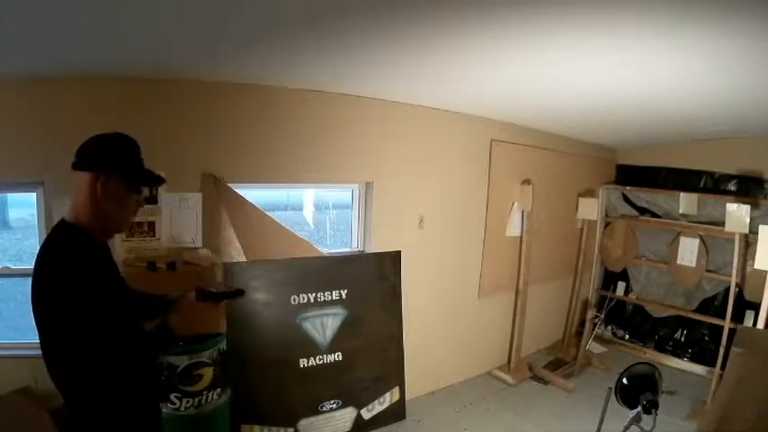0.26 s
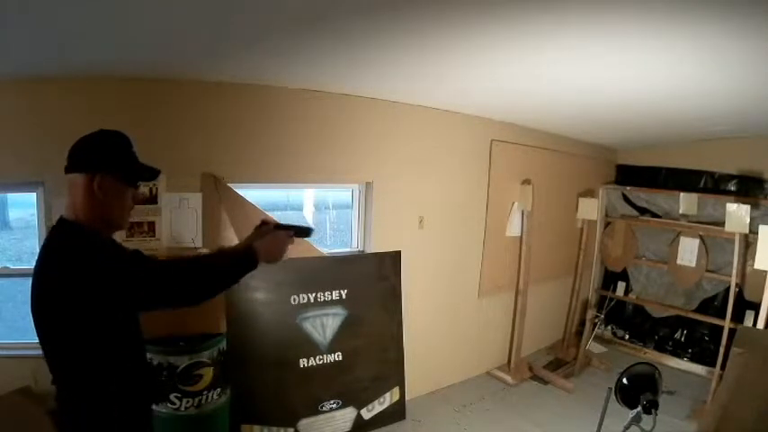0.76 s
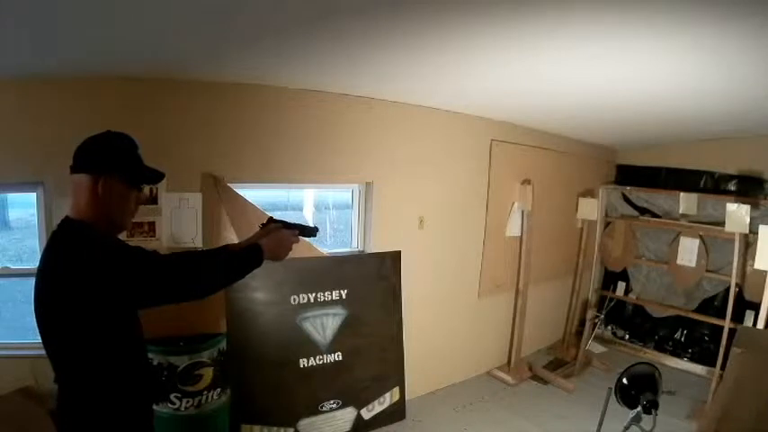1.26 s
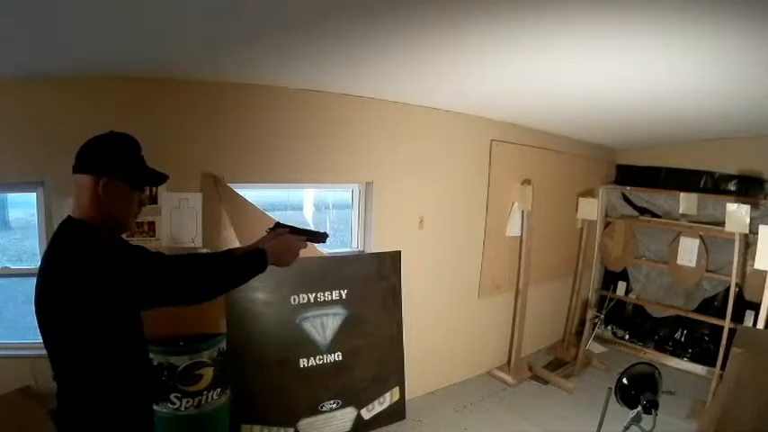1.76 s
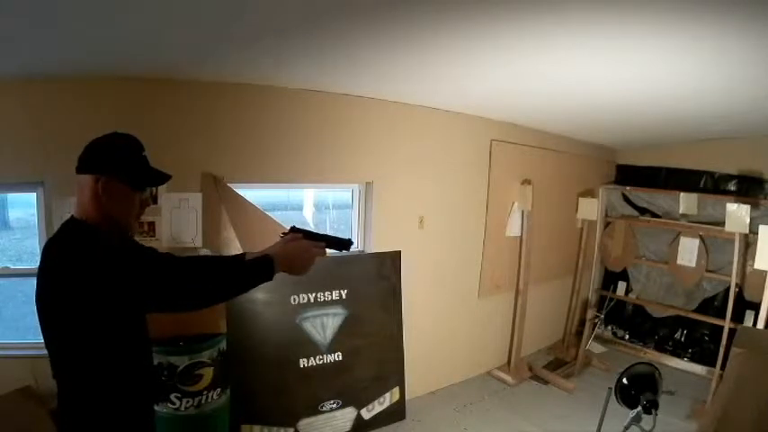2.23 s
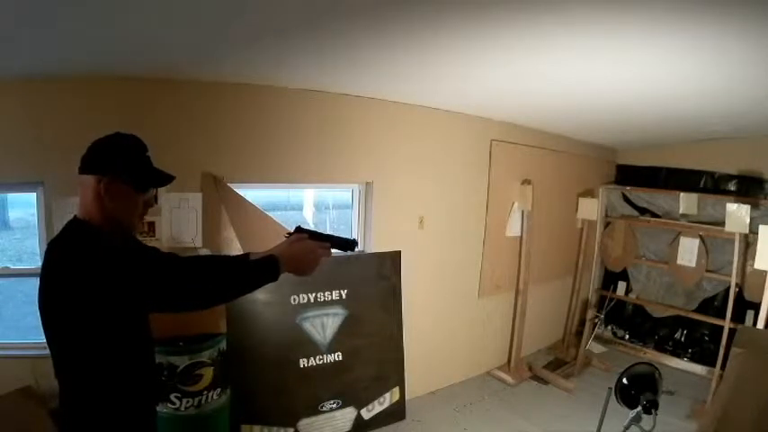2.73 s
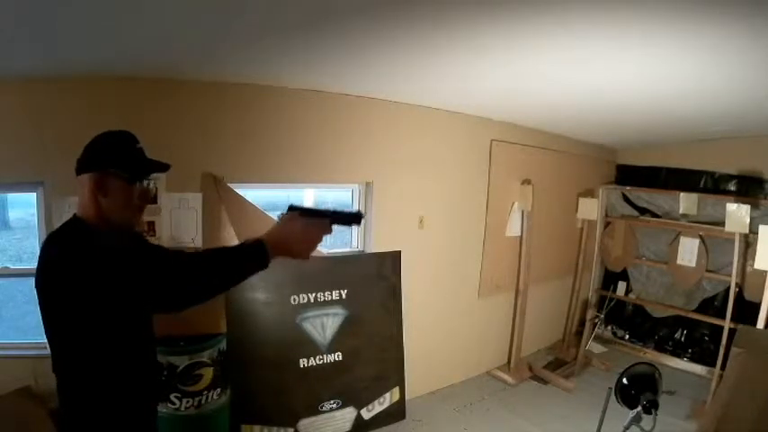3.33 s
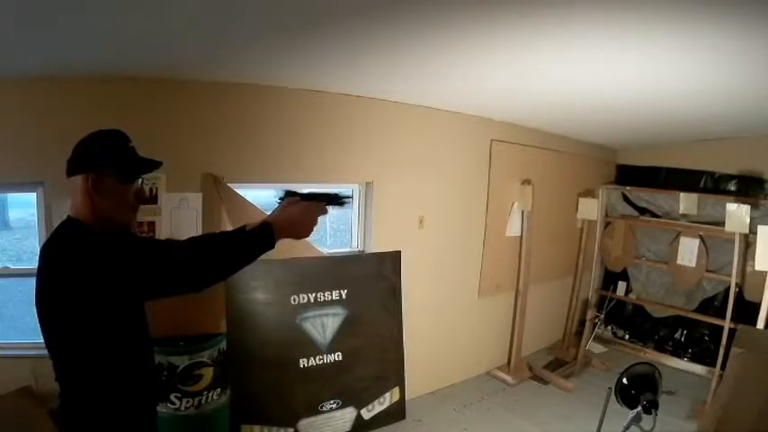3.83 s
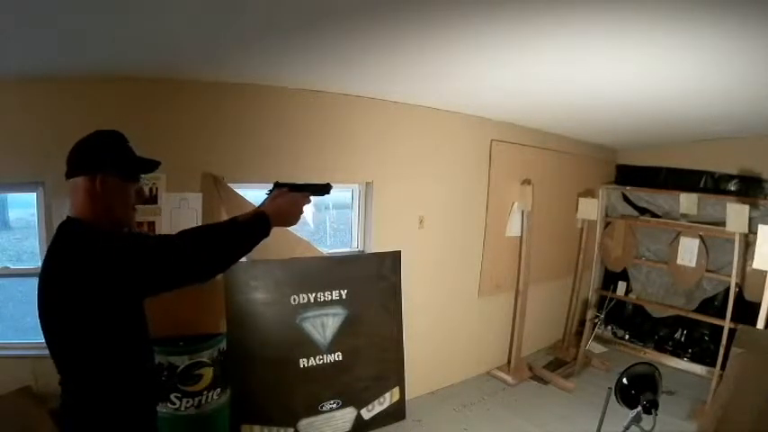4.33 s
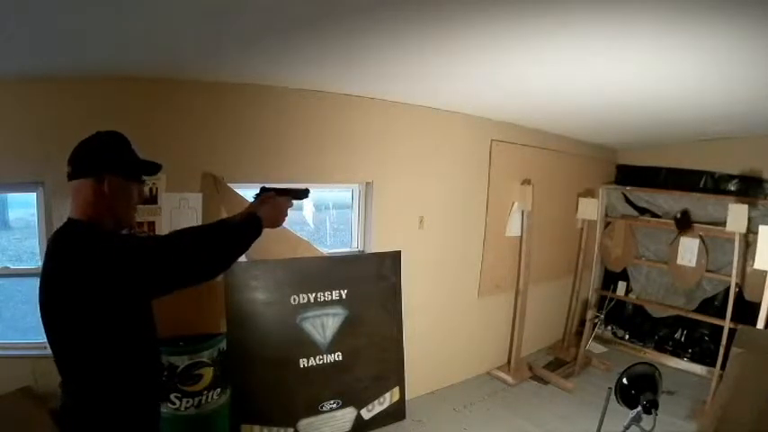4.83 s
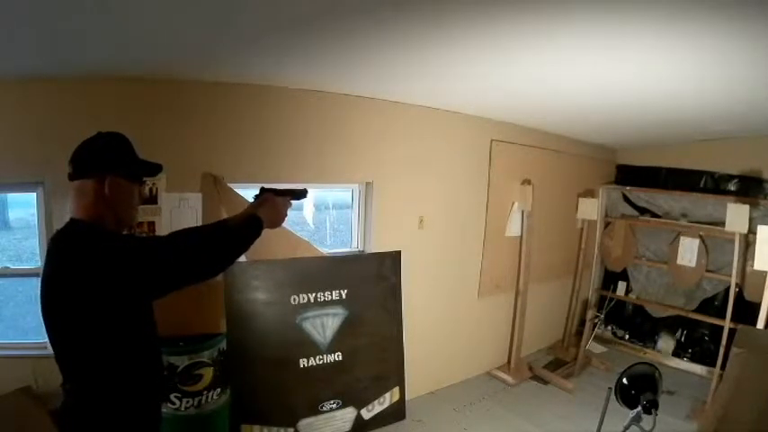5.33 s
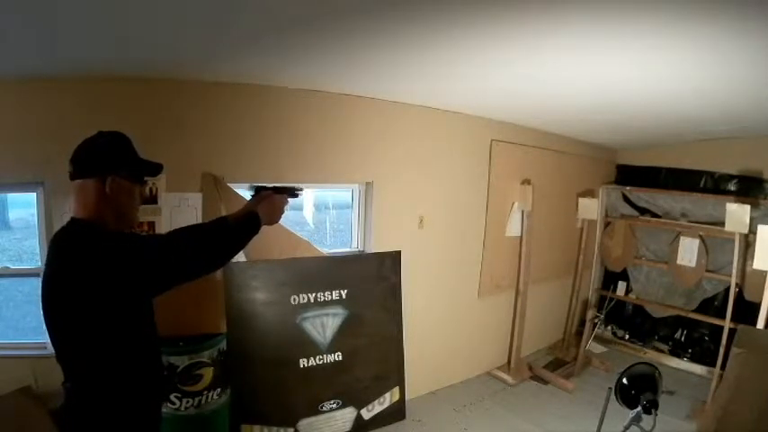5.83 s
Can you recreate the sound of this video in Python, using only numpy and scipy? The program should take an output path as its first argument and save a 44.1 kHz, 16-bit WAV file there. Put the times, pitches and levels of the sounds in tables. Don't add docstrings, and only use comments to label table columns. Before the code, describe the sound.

In a bare, reverberant workshop, a trigger creaks and a pistol slide clacks loudly. After a pause come two separate gas-pistol shots, then seven in a quick string. Each is a hard, hollow pop with a metallic slide clatter and a pellet clanking on steel farther off. Later targets topple with rattles and pellets tick on the floor. A small nearby camera microphone clips and ducks.

```python
import sys
import numpy as np
from scipy import signal
from scipy.fft import rfft, irfft, next_fast_len
from scipy.io import wavfile
from scipy.ndimage import uniform_filter1d, map_coordinates

SR = 44100
rng = np.random.default_rng(int(sys.argv[2]) if len(sys.argv) > 2 else 0)


def gain_from_db(level_db):
    decades = np.asarray(level_db, float) / 20
    return 10 ** decades


def put_to_file(sound):
    columns = np.atleast_2d(sound).T
    safe = np.clip(columns, -1, 1)
    whole_steps = np.round(safe * 32767)
    wavfile.write(sys.argv[1], SR, whole_steps.astype(np.int16))


N = 268569


def along(points, hz):
    f, value = np.transpose(points)
    return np.interp(np.log(hz + 1), np.log(f + 1), value)


def unit(x):
    return x / np.sqrt(np.mean(x ** 2) + 1e-20)


def coloured(x, gain):
    m = next_fast_len(len(x) + 2048)
    cepstrum = irfft(np.log(gain(np.fft.rfftfreq(m, 1 / SR)) + 1e-6), m)
    cepstrum[1:m // 2] *= 2
    cepstrum[m // 2 + 1:] = 0
    response = np.exp(rfft(cepstrum))
    return irfft(rfft(x, m) * response, m)[:len(x)]


def add(track, s, x):
    part = track[round(s * SR):][:len(x)]
    part += x[:len(part)]


# f/Hz, t60/s, level/dB
ROOM_DECAY = [(100.1, .26, -9), (331.24, 0.32887, 0), (1030.9, 0.43863, -1.5), (2864.8, 0.41184, 1.5),
              (8127, 0.34132, 1), (14942, 0.28693, -7)]


def roomy(x, wet_db, source=None):
    source = x if source is None else source
    hz, t, noise = signal.stft(rng.standard_normal(SR * 3 // 4), SR, nperseg=256)
    t60 = along([(f, decay) for f, decay, _ in ROOM_DECAY], hz)[:, None]
    walls_db = along([(f, level) for f, _, level in ROOM_DECAY], hz)[:, None]
    tail = signal.istft(noise * gain_from_db(walls_db - 60 * t / t60), SR, nperseg=256)[1]
    tail *= 1 - np.exp(-np.arange(len(tail)) / SR / 0.0017)
    wet = signal.fftconvolve(source, tail / np.linalg.norm(tail))
    return gain_from_db(wet_db) * wet + np.pad(x, (0, len(wet) - len(x)))


def resonant(spectrum, modes, hz):
    peaks = sum(gain_from_db(db) / (1 + ((hz - centre) / width) ** 2) for centre, width, db in modes)
    return gain_from_db(along(spectrum, hz)) + peaks


def blow(spectrum, modes, tilt, t60, rise, wet_db):
    t = np.arange(SR // 8) / SR
    spikes = rng.standard_normal(len(t)) * gain_from_db(3.7045 * rng.standard_normal(len(t)))
    burst = spikes * gain_from_db(-60 * t / t60) * (1 - np.exp(-t / rise)) ** 2
    burst = coloured(burst, lambda hz: resonant(spectrum, modes, hz) * gain_from_db(along(tilt, hz)))
    pulse = coloured(1. * (t == 0), lambda hz: resonant(spectrum, modes, hz) * gain_from_db(0.73 * along(tilt, hz)))
    pulse *= np.linalg.norm(burst) / np.linalg.norm(pulse)
    return roomy(burst, wet_db, pulse) / np.abs(burst).max()


# f/Hz, level/dB per Hz
ROOM_TONE = [(12, -29), (20, 1), (81, -18.5), (98, -16), (222, -22.5), (262, -24), (367, -25),
             (1330, -34.5), (7520, -42), (8890, -42), (16000, -39)]
ROOM_TONE_DB = -56
WHINE_HZ, WHINE_DB = 8658, -75


def hush():
    def density(hz):
        drone = gain_from_db(-13.0) * 20 / np.hypot(20, 2 * (hz - 70))
        return gain_from_db(along(ROOM_TONE, hz)) + drone

    tone = unit(coloured(rng.standard_normal(N), density))
    whine = np.sin(2 * np.pi * WHINE_HZ * np.arange(N) / SR)
    return gain_from_db(ROOM_TONE_DB) * tone + gain_from_db(WHINE_DB + 6) * whine


# t/s, peak level/dB, treble level/dB, body level/dB, echo level/dB
TICKS = [(0.1779, -29.5, -6, -2.5, 5.5), (0.1882, -32, -8.5, 9.5, 9.5), (0.649, -48.5, -18.5, 17.5, -4),
         (0.7727, -46, -11.5, 7, -1.5), (0.8093, -53.5, -10.5, 0.5, 8.5), (0.8803, -48.5, -11.5, -5.5, 1),
         (1.1105, -54.5, -19.5, -21, -2.5), (1.295, -35, -5.5, 10.5, 6), (1.6888, -21.5, -16.5, -8, 3.5),
         (2.0143, -42.5, -16, 2.5, 10.5), (2.1724, -47.5, -17.5, 6.5, 5.5), (2.2282, -35.5, -9, 4.5, 10),
         (2.4114, -45, -25, 6, 5), (2.578, -41, -18.5, 5.5, 5.5), (2.9916, -22, -16.5, -14, 2.5),
         (3.0347, -9.5, -17.5, -18, -5.5), (3.048, -19.5, -25.5, -5, 2), (4.1279, -8.5, -15, -11.5, -3.5),
         (4.7999, -18, 6, -11, 1.5), (4.8575, -16, -16.5, 15, 3.5), (4.9485, -23, 14, -6, -17),
         (5.1804, -26, -16.5, 5, -1.5), (5.3983, -9.5, -6.5, -7.5, -4)]
# f/Hz, level/dB per Hz
CLICK_SPECTRUM = [(120, -75.5), (200, -45), (777, -30.5), (1040, 1.5), (1560, -4.5), (1870, -6.5),
                  (3370, -9), (3760, -10), (4270, -7.5), (6640, -8.5), (7270, -15), (8270, -7.5),
                  (16000, -19)]
TICK_LOW_DB, BODY_DEEPENS = 26.5, .45


def ticks(air):
    out = np.zeros(N)
    for s, db, treble_db, body_db, wet_db in TICKS:
        low_db = TICK_LOW_DB + BODY_DEEPENS * body_db
        tilt = [(300, low_db - 5), (700, low_db), (1050, body_db), (2200, body_db),
                (3500, 0.0036), (8000, treble_db + 9.5)]
        click = blow(CLICK_SPECTRUM, [], tilt, t60=0.014, rise=.0004, wet_db=wet_db)
        add(out, s, gain_from_db(db - 0.5) * air(s) * click)
    return out


# t/s, peak level/dB, burst t60/s, echo level/dB
RACK = [
    (0.203, -26.5, 0.04905, 0.5),
    (0.2114, 0, 0.05666, -0.5),
    (0.2162, -2, .03, -2),
    (0.22, -4.5, .03, -6.5),
    (1.3333, -19, .04, 0),
    (2.586, -15.5, 0.045, -1),
]
# f/Hz, width/Hz, level/dB
CATCH_MODES = [(1075.8, 210, -8.5), (2039.8, 630, 0.5), (2921.2, 240, -9), (3754.7, 280, -2),
               (5148.5, 670, 1), (6731, 470, -0.5), (8208, 1200, -8), (10685, 550, -6), (12230, 2300, -5),
               (15018, 590, -15)]


def rack(air):
    out = np.zeros(N)
    modes = [(hz, width / 2, db + 5.5) for hz, width, db in CATCH_MODES]
    tilt = [(300, -2.5), (600, 3.0), (900, 2)]
    for s, db, t60, wet_db in RACK:
        click = blow(CLICK_SPECTRUM, modes, tilt, t60, rise=0.00084, wet_db=wet_db)
        add(out, s, gain_from_db(db) * air(s) * click)
    return out


# f/Hz, level/dB per Hz
METAL_SPECTRUM = [(24, -60), (40, -21.5), (81, -13.5), (130, -18.5), (226, -7.5), (455, -6), (516, -4),
                  (790, -5.5), (1410, 0), (2910, -16.5), (3830, -21.5), (4130, -12.5), (7540, -30.5),
                  (11300, -17), (16000, -30.5)]
# f/Hz, width/Hz, level/dB
FRAME_MODES = [(1473.2, 630, -3), (2186.7, 150, -2.5), (3755.1, 77, 6.5), (5364.3, 260, -3),
               (6770.4, 220, -8.5), (8469.8, 350, -7.5), (11045, 120, -6), (11661, 120, -15.5),
               (11929, 260, -12.5), (14650, 1900, -15)]


def blows(table, air, gain_db, wet_db, rise):
    out = np.zeros(N)
    modes = [(hz, 2.1783 * width, db - 11) for hz, width, db in FRAME_MODES]
    for s, db, treble_db, thump_db, ring_db, t60 in table:
        tilt = [(70, thump_db + 15.5), (250, thump_db + 24), (600, 0.0041), (3300, 0.007),
                (3800, ring_db + 18.5), (4400, 0.0098), (6500, treble_db + 12)]
        knock = blow(METAL_SPECTRUM, modes, tilt, t60, rise, wet_db)
        add(out, s, gain_from_db(db + gain_db) * air(s) * knock)
    return out


# t/s, gas blast level/dB, gain reduction level/dB, slide back after t/s, slide home after t/s
SHOTS = [
    (1.3358, -3, 31, .0105, .035),
    (2.5903, -4, 36.5, .0075, .029),
    (3.436, -1.5, 40.5, .011, .030),
    (3.7882, 1, 44.5, .0145, .0395),
    (4.191, 0, 59, .013, .040),
    (4.6286, -0.5, 39.5, .0145, .0415),
    (5.033, 1, 39, .015, .043),
    (5.453, -7, 32.5, .014, .041),
    (5.797, 1, 39.5, .017, .043),
]
# peak level/dB, treble level/dB, thump level/dB, slide ring level/dB, burst t60/s
BLAST = (-0.5, -6.5, -30.5, -20, 0.2368)
PUFF = (2.5, -12, -23, -21, 0.0549)
BACK = (2.5, -5, -14, -21.5, 0.0605)
HOME = (0.5, -5, -25, -18, 0.0002)
PUFF_S = .005
THUMP_FADE_DB = 1.5146


def pistol(air):
    knocks = []
    for k, (s, gas_db, _, back, home) in enumerate(SHOTS):
        parts = [(0, gas_db, BLAST), (PUFF_S, gas_db, PUFF), (back, 0, BACK), (home, 0, HOME)]
        for after, gain_db, (db, treble_db, thump_db, ring_db, t60) in parts:
            thump_db = thump_db - THUMP_FADE_DB * (k - 4)
            knocks.append((s + after, gain_db + db, treble_db, thump_db, ring_db, t60))
    return blows(knocks, air, gain_db=3, wet_db=-5.5, rise=0.0009)


BARREL_HZ, BARREL_DB, BARREL_T60_S = 1160, -3, .05


def barrel(air):
    out = np.zeros(N)
    t = np.arange(SR // 8) / SR
    for s, gas_db, *_ in SHOTS:
        hz = BARREL_HZ * (1 + .03 * rng.standard_normal())
        envelope = gain_from_db(BARREL_DB + gas_db - 60 * t / BARREL_T60_S) * (1 - np.exp(-t / 0.0017))
        add(out, s, air(s) * envelope * np.sin(2 * np.pi * hz * t))
    return out


SLIDE_HZ, SLIDE_DB, SLIDE_T60_S = 3790, -8.5, 0.067
RING_GROWS_DB = 0.235


def slide_ring(air):
    out = np.zeros(N)
    t = np.arange(SR // 4) / SR
    for k, (s, _, _, back, home) in enumerate(SHOTS):
        level_db = SLIDE_DB + RING_GROWS_DB * (k - 6)
        for stop in (s + back, s + home):
            envelope = gain_from_db(level_db - 60 * t / SLIDE_T60_S) * (1 - np.exp(-t / .001))
            note = envelope * np.sin(2 * np.pi * SLIDE_HZ * t)
            add(out, stop, air(stop) * roomy(note, wet_db=-13.5))
    return out


# t/s, peak level/dB, treble level/dB, stand ring level/dB
STRIKES = [(1.399, 2, -4, -39.5), (2.659, 2.5, -4.5, -40), (3.482, -1, -10.5, -37.5),
           (3.844, -1, -24, -36.5), (3.882, -12.5, -11, -42), (4.259, -8, -9, -25.5),
           (4.268, -1, -10, -48.5), (4.699, -13.5, -8, -29), (5.091, -3, -15.5, -36), (5.503, 0.5, -9, -52),
           (5.527, 1.5, -23.5, -40), (5.833, -2, -8.5, -45), (5.878, -3, -29.5, -26)]
STRIKE_THUMP_DB, STRIKE_RING_DB, STRIKE_T60_S = -32, -27, .065
RAIL_HZ, RAIL_T60_S = 752, 0.54946
# t/s, f/Hz, level/dB, t60/s
PLATE_RINGS = [(1.4, 1471, -40.5, 0.26), (2.659, 1188, -52.5, 0.8248), (3.48, 1300, -34, .4),
               (3.5, 1340, -20, 0.4075), (3.5, 1182, -26.5, 0.592), (4.262, 231, -47, 0.4867),
               (5.3, 1090, -29.5, .45), (4.26, 2030, -23.5, 0.3051), (4.464, 746, -15, 0.2932),
               (4.699, 234.1, -42, 0.6105), (4.7, 900, -39, 0.8536), (4.698, 1220, -37, 0.6583),
               (4.701, 1485, -35.5, 0.4628), (5.389, 1636, 2, 0.0817), (5.5, 1790, -21, 0.3912),
               (5.881, 1210, -26.5, 0.6)]


def pellets(air):
    strikes = [(s, db, treble_db, STRIKE_THUMP_DB, STRIKE_RING_DB, STRIKE_T60_S)
               for s, db, treble_db, _ in STRIKES]
    out = blows(strikes, air, gain_db=-1.0, wet_db=-4.5, rise=0.00019)
    t = np.arange(SR) / SR
    swell = 1 - np.exp(-t / 0.0059)
    rail = [(s, RAIL_HZ, ring_db, RAIL_T60_S) for s, _, _, ring_db in STRIKES]
    for s, hz, db, t60 in rail + PLATE_RINGS:
        flutter = map_coordinates(rng.standard_normal(40), [t * 38])
        envelope = gain_from_db(db + 4.4 * flutter - 60 * t / t60) * swell
        add(out, s, air(s) * envelope * np.sin(2 * np.pi * hz * t))
    return out


# t/s, rise time/s, length/s, rattle level/dB, treble level/dB
TOPPLES = [
    (3.355, 0.02008, .07, -17.5, -26),
    (3.421, 0.0057, 0.017, -10.5, -24.5),
    (4.463, 0.0123, .07, -12, -10),
    (4.524, 0.056, 0.049, -13, -16),
    (5.323, .04, .046, -7, -40),
    (5.368, 0.02, .05, -2, -17),
]
# f/Hz, level/dB per Hz
WOOD_SPECTRUM = [(47, -53), (80, -28), (550, -10), (980, -7.5), (1140, -3.5), (2490, -14), (2780, -23),
                 (5640, -20.5), (16000, -44.5)]
TOPPLE_RISE_DB, TOPPLE_SAG_DB = 12, 92


def topple(air):
    out = np.zeros(N)
    shell = [(hz, 1.7 * width, db - 12.5) for hz, width, db in FRAME_MODES]
    for s, rise, length, db, treble_db in TOPPLES:
        t = np.arange(0, length, 1 / SR)
        fall_db = np.maximum(TOPPLE_RISE_DB * (1 - t / rise), TOPPLE_SAG_DB * (t - rise))
        knocks = rng.standard_normal(len(t)) * (rng.random(len(t)) < 6000 / SR)
        body = unit(coloured(knocks, lambda hz: gain_from_db(along(WOOD_SPECTRUM, hz)) / (1 + (hz / 6500) ** 4)))
        edge = unit(coloured(knocks, lambda hz: resonant(METAL_SPECTRUM, shell, hz)
                             / (1 + (4300 / (hz + 1)) ** 4)))
        mix = body + gain_from_db(treble_db - .4 * fall_db) * edge
        rattle = gain_from_db(db - fall_db - 2.5) * air(s + t - .002) * mix
        add(out, s, roomy(rattle, wet_db=-3.0))
    return out


# t/s, gain reduction level/dB
DUCKS = [
    (.211, 18),
    (2.586, 26.5),
    (3.034, 2.5),
    (3.354, 14.5),
    (3.4, 13.5),
    (4.464, 24.5),
    (4.53, 23),
    (5.323, 22),
    (5.367, 28.5),
    (5.39, 36.5),
]
RECOVERY_DB = 96
LATE_S, LATE_DB = 0.02, 2.5447


def gain_cut_db():
    t = np.arange(N) / SR
    ducks = DUCKS + [(s, depth) for s, _, depth, _, _ in SHOTS]
    ramps = []
    for s, depth in ducks:
        ramp = depth - RECOVERY_DB * (t - s) - LATE_DB * (t < s + LATE_S)
        ramps.append(ramp * (t > s))
    return uniform_filter1d(np.maximum(np.max(ramps, axis=0), 0), size=88)


def scene():
    reduction_db = gain_cut_db()

    def air(s):
        return gain_from_db(reduction_db[np.round((s + .002) * SR).astype(int)])

    small = ticks(air) + rack(air)
    shots = pistol(air) + barrel(air) + slide_ring(air)
    targets = pellets(air) + topple(air)
    return (small + shots + targets)[None]


def low_pass(x):
    return signal.sosfilt(signal.butter(12, 15950, fs=SR, output="sos"), x)


def record(dry):
    x = dry * gain_from_db(-gain_cut_db()) + hush()
    x = signal.lfilter(*signal.butter(2, 60 / (SR / 2), "high"), x)
    x = signal.sosfilt(signal.cheby2(10, 40, 16200, fs=SR, output="sos"), x)
    x = x / (1 + np.abs(x / .93) ** 16) ** (1 / 16)
    return low_pass(x)


dry = scene()
out = record(dry)
put_to_file(out)
```